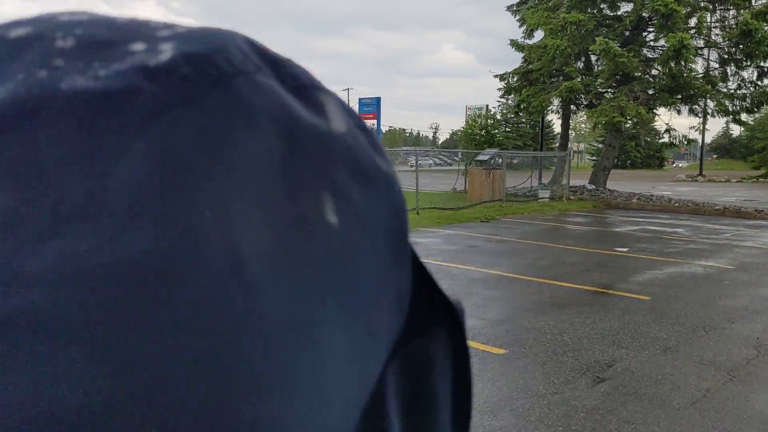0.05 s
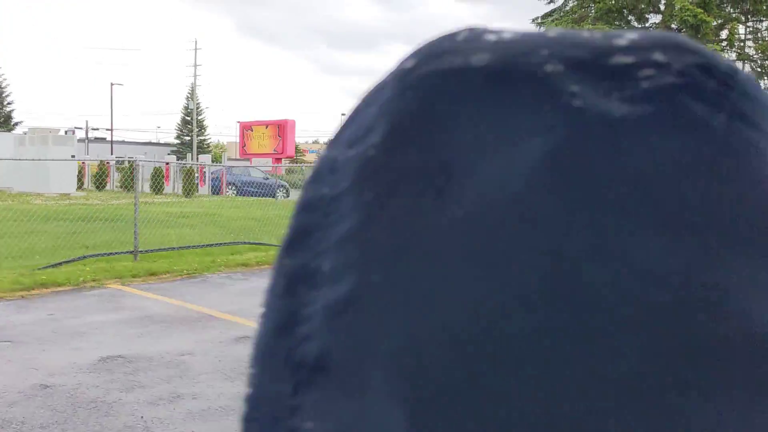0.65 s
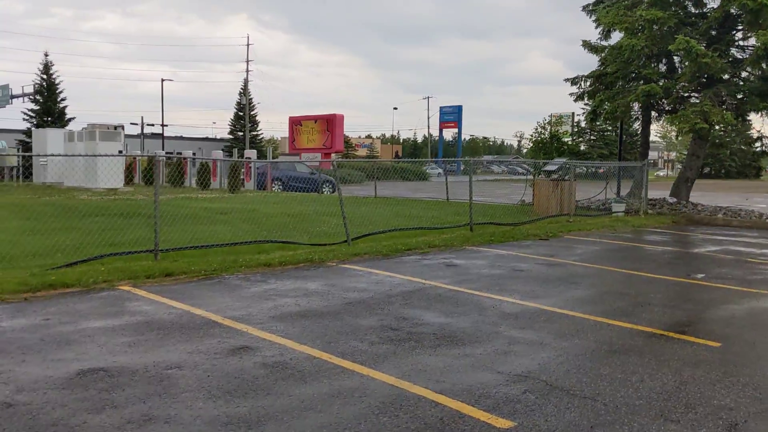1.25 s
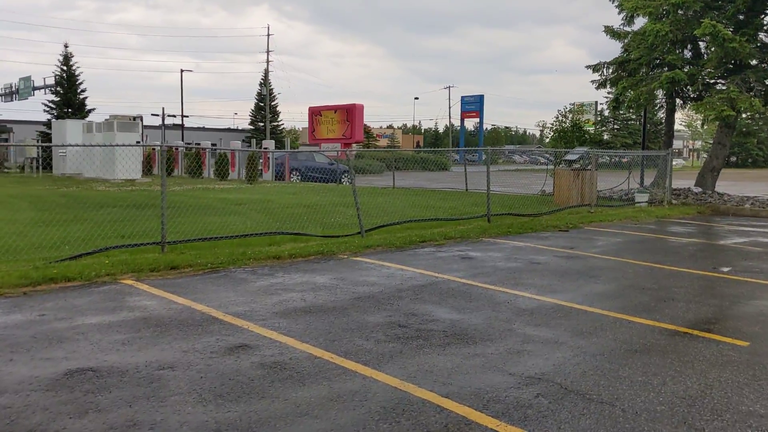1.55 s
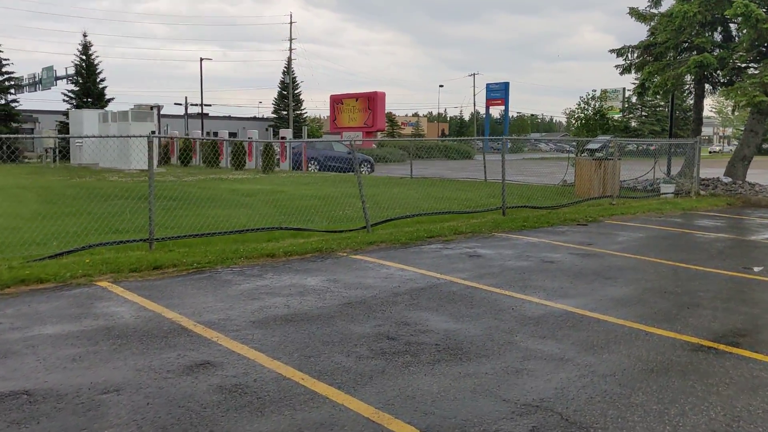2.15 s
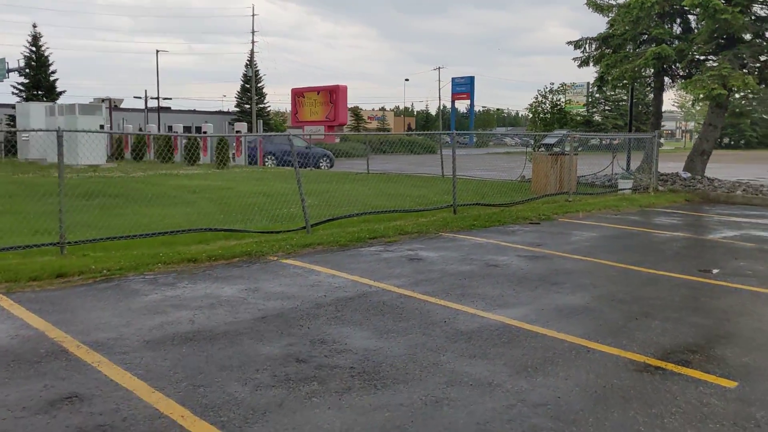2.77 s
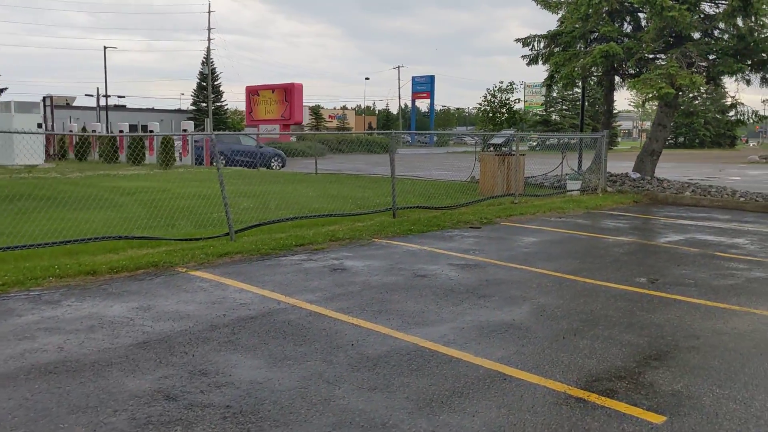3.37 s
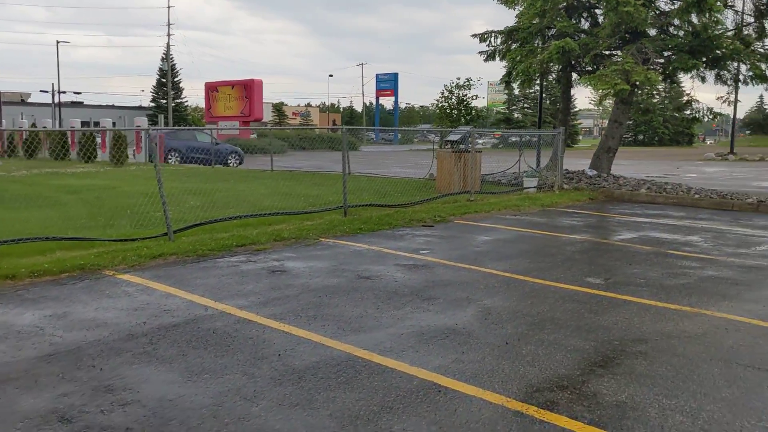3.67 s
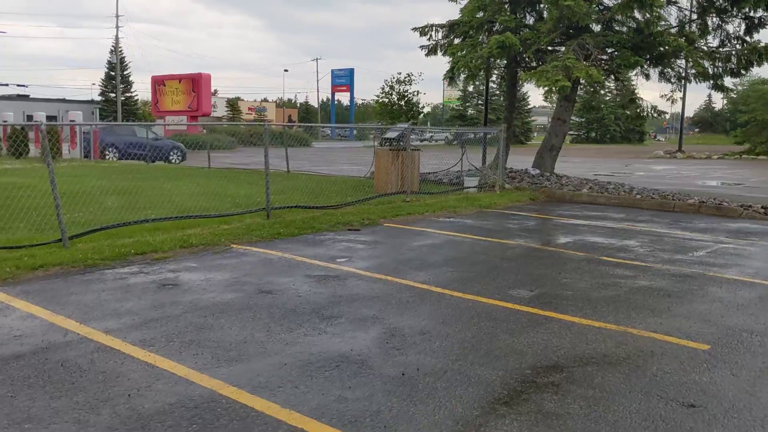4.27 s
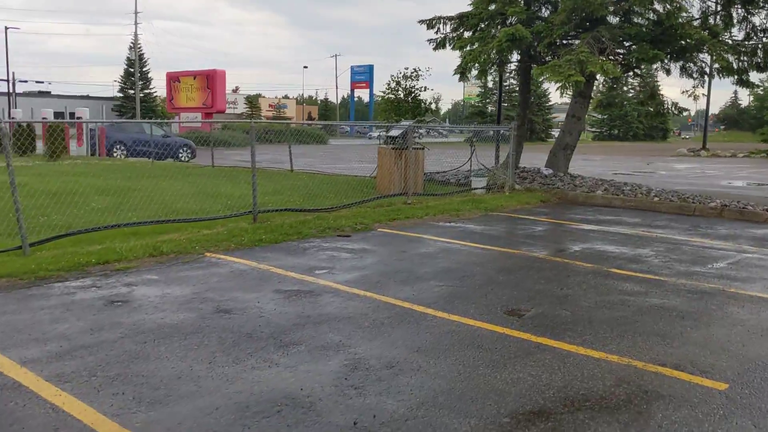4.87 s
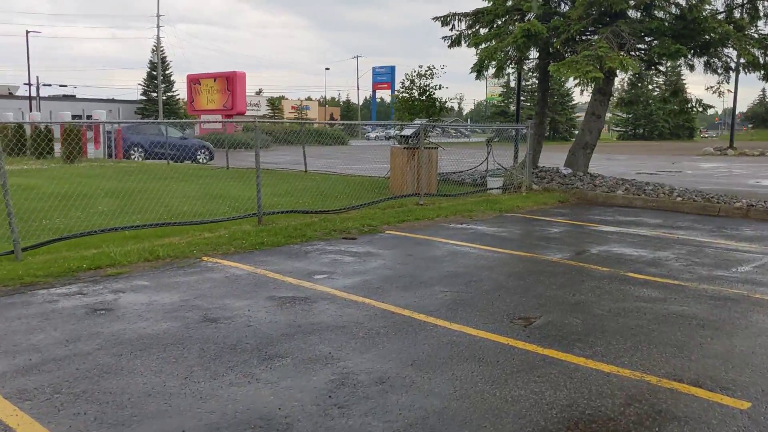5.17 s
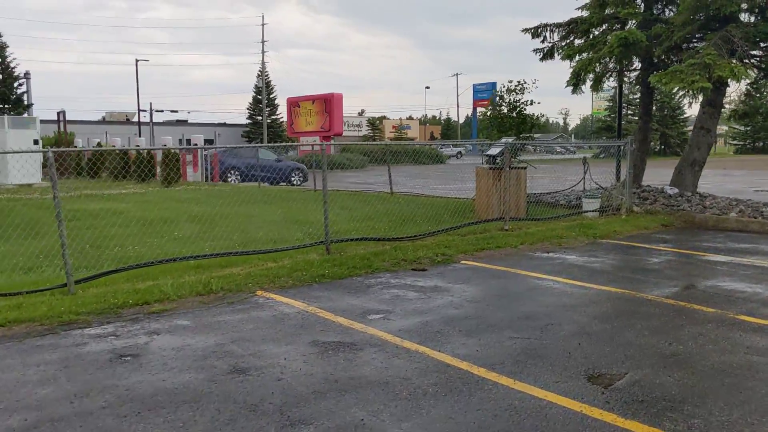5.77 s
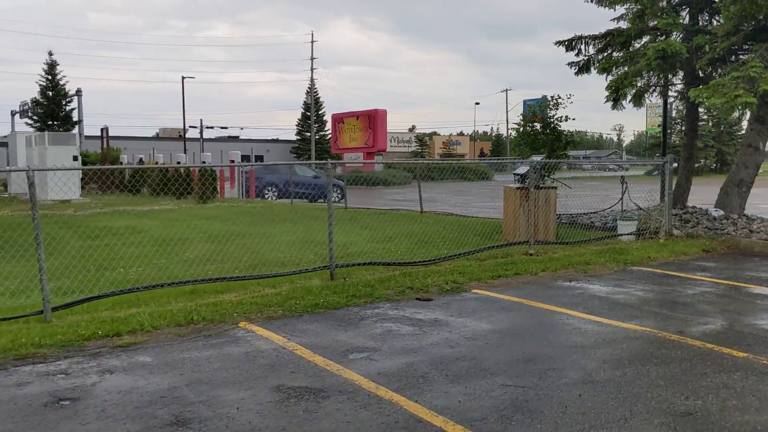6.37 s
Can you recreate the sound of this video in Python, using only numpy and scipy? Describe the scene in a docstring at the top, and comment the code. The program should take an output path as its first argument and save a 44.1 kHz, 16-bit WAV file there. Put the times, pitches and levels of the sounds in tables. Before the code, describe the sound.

Light rain falls on an umbrella held just above the microphone in a wet car park. Big drops pat the tight cloth irregularly, with small ones pattering and ticking between them. Fine rain sizzles softly on the ground, with a few tiny splashes. Behind it, a low electrical hum holds steady and faraway traffic washes along, one engine swelling gently as it slows.

```python
"""Light rain on an umbrella held just above the microphone, in a wet car park.
Big drops pat the tight cloth, small ones patter and tick between them, and the cloth shivers.
Fine rain sizzles on the ground, where splashes and a brief trickle of drips ring as tiny bubbles.
Behind the rain, a machine hums on mains power and a thin, distant whine fades early on.
An engine swells and slows in the wash of faraway traffic."""
import sys
import numpy as np
from scipy import signal
from scipy.fft import rfft, irfft, next_fast_len
from scipy.io import wavfile
from scipy.ndimage import map_coordinates

SR = 44100
rng = np.random.default_rng(int(sys.argv[2]) if len(sys.argv) > 2 else 0)


def pcm_store(signal):
    """Save signal as 16-bit PCM."""
    levels = np.round(np.clip(np.atleast_2d(signal), -1, 1) * 32767)
    wavfile.write(sys.argv[1], SR, levels.astype(np.int16).T)


N = 283122

# Distant traffic. Each row: time in seconds, then relative dB of rumble, road roar and tyre noise.
TRAFFIC_LEVELS = [(0.0, -42, -41, -53), (0.6, -43, -41.5, -45), (2.1, -42, -42, -45.5),
                  (3.1, -42, -43.5, -46.5), (4.3, -44, -45.5, -46.5), (5.3, -44, -42.5, -43),
                  (6.42, -44, -47, -46)]
# The passing engine. Each row: time in seconds, firing rate in Hz, relative level in dB.
ENGINE_PATH = [(0, 90, -54), (1.3, 89.4, -40), (2.6, 86.7, -44), (3.45, 84.4, -36.5), (4.2, 82.8, -37),
               (5.1, 80.7, -43), (5.8, 76.5, -34), (6.42, 75, -44)]
# The distant whine. Each row: time in seconds, pitch in Hz, level in dB.
WHINE_PATH = [(0, 296, -48), (.6, 296, -48), (1.1, 304.4, -61.5), (6.42, 300.2, -60.5)]
# The hum's first three harmonics. Each row: level in dB, share of the swell it follows.
HUM_HARMONICS = [(-32, 0.29), (-34.5, 1), (-39, 0.88)]
# The hum's weak overtones. Each row: pitch in Hz, level in dB.
HUM_OVERTONES = [(240.8, -49), (316, -66.5), (361, -62), (373.5, -59)]
# The hum swells and fades as the microphone moves. Each row: time in seconds, change in dB.
HUM_SWELL_DB = [(0, -.5), (.8, 0.6), (1.5, -3), (2.1, .5), (2.95, 0.5), (3.5, -1.5), (4.3, 2), (4.9, -5),
                (5.25, 1.7), (6.42, -.5)]
# The tone colours of traffic and fine rain. Each row: frequency in Hz, relative strength in dB.
RUMBLE_COLOUR = [(15, -14), (35, -23), (55, 0), (90, 1.5), (140, 0), (230, -4), (300, -12.5), (420, -15),
                 (900, -39.5)]
ROAD_COLOUR = [(100, -26), (300, -9.5), (600, 1), (850, -7), (1400, -7.5), (4000, -31)]
TYRE_COLOUR = [(400, -23), (800, 2), (1150, 1), (1400, -2), (1800, -1), (2600, -8.5), (5000, -13),
               (10000, -35)]
HISS_COLOUR = [(800, -6), (2500, 4.5), (4500, 9.5), (7000, 1), (10500, 1), (12500, -3.5), (14500, -18),
               (16000, -22)]
SIZZLE_COLOUR = [(900, -43), (2000, 3.5), (3200, 0.5), (4600, -5.5), (7000, -17), (14000, -33)]
FIZZ_COLOUR = [(7000, -37), (10800, -11), (12200, 8), (13800, -1), (16000, -24)]
# Sound from all around. Each row: frequency in Hz, how alike left and right are (1 is the same).
STEREO_LIKENESS = [(60, 0.9), (130, 0.95), (290, 0.84), (640, 0.38), (1300, 0.0059), (15000, 0.035)]
# Fine rain. Each row: time in seconds, then relative dB of sizzle, hiss and fizz.
DRIZZLE_LEVELS = [(0.0, -45.5, -57, -66), (0.5, -43, -56, -66), (2.0, -42.5, -48, -65),
                  (2.9, -44.5, -49, -65), (3.8, -50.5, -51, -58.5), (4.9, -50, -50, -61),
                  (5.6, -52, -56.5, -62), (6.42, -54, -59.5, -69)]
# Soft splashes on the ground. Each row: time in seconds, relative level in dB, centre pitch in Hz.
GROUND_SPLASHES = [(0.185, -50.5, 5460), (0.592, -51, 13000), (0.658, -49, 3020), (2.287, -49.5, 7050),
                   (2.547, -46, 3940), (3.333, -59, 7900), (5.058, -54, 13100), (5.232, -46.5, 2684)]
# How the cloth answers a drop. Each row: frequency in Hz, relative strength in dB.
CLOTH_COLOUR = [(60, -29), (250, -8), (400, 1), (540, 3.5), (750, 1), (1000, -3), (1400, -1.5), (2400, -6),
                (4000, -12), (6500, -24), (12500, -28), (16000, -37)]
# A bursting drop smears its sound in time. Each row: frequency in Hz, share of the smear it gets.
SPATTER_SHARE = [(500, 0.0094), (1200, 0.18), (2200, 0.45), (4000, 0.7), (7000, 1)]
# Big drops on the cloth. Each row: time in seconds, level in dB, snap (upper middle) boost in dB,
# spray (treble) boost in dB.
BIG_DROPS = [(0.053, -38.5, -6, -3), (0.0966, -32.4, -1, 5), (0.121, -37.5, 0, -7), (0.1426, -39, -5, 5),
             (0.2815, -35.5, 0, -4), (0.302, -34.5, -13, -11), (0.3765, -36.5, -7, -5),
             (0.5395, -37, -2, 4), (0.5657, -48, 5, 25), (0.6565, -36, -1, 0), (0.943, -34, -4, -11),
             (1.0807, -33, -6, -4), (1.3169, -32.5, -5.5, -1), (1.4732, -41, 2, 12), (1.52, -34.5, 4, 2),
             (1.5625, -30, -1.5, 3), (1.7315, -33, 8.5, 6.5), (1.8243, -34, 5, 1), (2.007, -35.5, -2, 0),
             (2.0143, -32.5, 0, 0), (2.1602, -34.5, -8, -3), (2.197, -35.5, 6, -7), (2.2342, -28.5, 1.5, 3),
             (2.254, -38, -6, 6), (2.4032, -36.5, 1, -10), (2.5617, -38, 2, -2), (2.6185, -36, -5, 6),
             (2.8028, -38.5, -3, -6), (2.9066, -44.5, 8, 25), (2.9491, -32, 0.5, 3),
             (3.0308, -38.5, -9, -1), (3.1499, -33.5, -6, -4), (3.2445, -28.5, -2, -3),
             (3.3527, -27.5, -3, 0), (3.39, -28, 5.5, 3), (3.4515, -37.5, -4, -10), (3.861, -34.5, 1, 1),
             (4.0472, -44, 10, 21), (4.237, -35.5, 1, 6), (4.3659, -35, 2, 4), (4.3812, -38.5, -8, -10),
             (4.5583, -34.5, -7, 0), (4.753, -37.5, -8, 4), (4.8109, -36.5, -6, -7), (5.0542, -37.5, 2, 0),
             (5.423, -37.5, -11, -6), (5.608, -37, -5, -12), (5.6558, -38.5, -1, -10),
             (5.74, -36.5, -3, 6.5), (5.9298, -38.5, 5, 4), (5.9943, -27.5, -0.5, -6),
             (6.0713, -40, -1, -13), (6.1618, -39, 4, 12.5), (6.2391, -37.5, -9, -15)]
# Peaks and dips of each microphone opening. Each row: centre in Hz, width in Hz, gain in dB.
LEFT_OPENING = [(930, 34, -7.5), (1370, 277, 5.5), (1556, 103, -6.5), (2278, 113, 7), (2530, 170, -3),
                (3540, 26, -11), (4320, 88, 3.5), (5220, 150, 3.5), (6860, 180, 1.5), (7150, 160, 7.5),
                (7260, 220, -2.5), (9070, 200, 5.5), (12200, 750, 1)]
RIGHT_OPENING = [(406, 41, -4), (633, 220, 1.5), (1400, 20, 9), (2110, 140, -1), (2456, 69, 5),
                 (5200, 130, -4), (6490, 120, -7), (6500, 370, 7.5), (7530, 120, 6.5), (8240, 200, 5),
                 (9100, 170, -17), (10040, 130, 8.5), (10650, 520, -14)]


def amp(db):
    """Turn decibels into a gain."""
    return 10 ** (np.asarray(db) / 20)


def unit(x):
    """Scale x to an average (rms) level of 1."""
    return x / np.sqrt(np.mean(x ** 2) + 1e-20)


def along(points, hz):
    """Read between (Hz, value) points on a log frequency scale."""
    point_hz, values = np.transpose(points)
    return np.interp(np.log(hz + 1), np.log(point_hz + 1), values)


def curves(rows):
    """Turn each column after the time into one value per sample."""
    times, *columns = np.transpose(rows)
    return [np.interp(np.arange(N) / SR, times, column) for column in columns]


def wobble(rate):
    """A smooth curve through `rate` random points a second."""
    stride = int(np.clip(SR / rate / 16, 1, 64))
    at = np.arange(0, N + stride, stride)
    points = rng.standard_normal(int(N * rate / SR) + 4)
    return np.interp(np.arange(N), at, map_coordinates(points, [at * rate / SR]))


def filtered(x, response):
    """Scale each frequency in x by response(hz)."""
    size = next_fast_len(N + 8192)
    return irfft(rfft(x, size) * response(np.fft.rfftfreq(size, 1 / SR)), size)[..., :N]


def pan(lean_db):
    """Two gains, the left one lean_db louder than the right."""
    return amp([[lean_db / 2], [-lean_db / 2]])


def add(track, s, sound):
    """Mix a stereo sound into the track at s seconds."""
    part = track[:, max(round(s * SR), 0):][:, :sound.shape[1]]
    part += sound[:, :part.shape[1]]


def tone(hz):
    """A pure tone that follows a pitch curve."""
    return np.sqrt(2) * np.sin(2 * np.pi * (np.cumsum(hz) / SR + rng.random()))


def wash(colour):
    """Noise from all around: left and right are alike in the bass, unrelated in the treble."""
    def response(hz):
        width = np.arccos(np.clip(along(STEREO_LIKENESS, hz), -1, 1)) / 2
        return amp(along(colour, hz)) * [np.cos(width), np.sin(width)]
    mid, side = filtered(rng.standard_normal((2, N)), response)
    return unit(np.array([mid + side, mid - side]))


def traffic():
    """Rumble, road roar and tyre noise from afar, with one engine slowing down."""
    rumble_db, road_db, tyre_db = curves(TRAFFIC_LEVELS)
    firing_hz, engine_db = curves(ENGINE_PATH)
    engine = amp(engine_db + 2.1 * wobble(7)) * tone(firing_hz + 0.856 * wobble(4.4))
    rumble = amp(rumble_db + 7.5) * wash(RUMBLE_COLOUR)
    road = amp(road_db - 4 + wobble(12)) * wash(ROAD_COLOUR)
    tyres = amp(tyre_db + 1 + wobble(12)) * wash(TYRE_COLOUR)
    return pan(2.75) * (engine + rumble + road) + pan(3) * tyres


def far_whine():
    """A thin, wavering tone in the distance that fades early on."""
    hz, db = curves(WHINE_PATH)
    return amp(db + 2.7 * wobble(5.98)) * tone(hz + wobble(5))


def machine_hum(mains_hz=60.2, drift_hz=0.091, waver_db=0.62):
    """Multiples of the mains pitch swell and fade together as the microphone moves; each also wavers."""
    pitch = mains_hz + drift_hz * wobble(3.03)
    swell_db, = curves(HUM_SWELL_DB)
    strong = sum(amp(db + share * swell_db + waver_db * wobble(4)) * tone(k * pitch)
                 for k, (db, share) in enumerate(HUM_HARMONICS, 1))
    weak = sum(amp(db + 2 * wobble(2.94)) * tone(hz + 0.603 * wobble(4.014)) for hz, db in HUM_OVERTONES)
    return pan(0.6) * (strong + weak)


def drizzle():
    """Fine rain on wet ground: a clumpy sizzle close by, a grainy hiss beyond, flurries of thin fizz."""
    sizzle_db, hiss_db, fizz_db = curves(DRIZZLE_LEVELS)
    sizzle = unit(wash(SIZZLE_COLOUR) * amp(2.5 * wobble(220)))
    hiss = unit(wash(HISS_COLOUR) * amp(0.5 * wobble(1500) + 2 * wobble(40)))
    fizz = unit(wash(FIZZ_COLOUR) * amp(2 * wobble(7.6) + 3.2 * wobble(45) + 1.5 * wobble(900)))
    return pan(7.5) * (amp(sizzle_db - 3.5) * sizzle + amp(hiss_db) * hiss + amp(fizz_db) * fizz)


def trickle(start_s=1.772, gap_s=0.0572, first_hz=3040, rise_hz_per_s=930, count=18):
    """Water runs off the umbrella in evenly spaced drips that creep up in pitch. Gives splash rows."""
    age = gap_s * np.arange(count)
    weight, pitch = rng.standard_normal((count, 2)).T
    centre_hz = (first_hz + rise_hz_per_s * age) * 2 ** (0.16 * pitch)
    level_db = -46.5 + 2 * weight
    return list(zip(start_s + age, level_db, centre_hz))


def splashes(scatter_s=0.0039, spread_octaves=0.18, ring_cycles=2.9, bubble_count=14, size=2048):
    """Each splash or drip is a cluster of tiny bubbles that ring briefly around one pitch."""
    out = np.zeros((2, N))
    t = (np.arange(size) - size / 2) / SR
    for s, db, centre_hz in [*GROUND_SPLASHES, *trickle()]:
        when, pitch, weight = rng.standard_normal((3, 2, bubble_count, 1))
        cycles = np.maximum(t - scatter_s * when, 0) * centre_hz * 2 ** (spread_octaves * pitch)
        swell_and_fade = (1 - np.exp(-cycles)) * np.exp(-cycles / ring_cycles)
        bubbles = amp(4.2 * weight) * np.sin(2 * np.pi * cycles) * swell_and_fade
        add(out, s + t[0], amp(db) * unit(bubbles.sum(axis=1)))
    return out * pan(5.5)


def shiver_and_echo(blows, shiver_db=-11, fade_s=0.1, echo_db=-17, echo_s=0.0076):
    """The cloth and ribs shiver briefly after each blow, and the ground sends it back once."""
    t = np.arange(SR // 8) / SR
    answer = rng.standard_normal((2, len(t))) * amp(-60 * t / fade_s)
    answer *= amp(shiver_db) / np.linalg.norm(answer[0])
    answer[:, 0] = 1  # the blow itself
    answer[:, round(echo_s * SR)] += amp(echo_db)
    return signal.fftconvolve(blows, answer, axes=1)[:, :N]


def pat(thud_db, snap_db, spray_db, lag_s, uneven_db, rebound_radians=0.83, spatter_s=0.001, size=512):
    """One drop: a sharp push and a dead rebound of the wet cloth, heard lag_s later on the right."""
    hz = np.fft.rfftfreq(size, 1 / SR)

    def random_curves():
        point_hz = np.geomspace(400, 16000, 24)
        return np.array([np.interp(hz, point_hz, row) for row in rng.standard_normal((2, 24))])

    boosts = [(380, thud_db), (650, 0), (1000, 0), (2200, snap_db),
              (4000, snap_db - 0.67 * thud_db), (7000, spray_db)]
    # Every spot on the cloth sends its own tone colour to each side.
    colour_db = along(CLOTH_COLOUR, hz) + along(boosts, hz) + uneven_db * random_curves()
    # This fold turns the colour into a pulse that starts sharply and then dies away.
    fold = 1 + np.sign(size / 2 - np.arange(size))
    fold[0] = 1
    push = -np.exp(rfft(irfft(np.log(amp(colour_db))) * fold) + 1j * rebound_radians)
    # A dull ripple runs through the tight cloth a millisecond ahead of the push.
    ripple = amp(-11) * np.exp(2j * np.pi * hz * 0.001 - (hz / 1500) ** 2)
    arrival_s = size / 4 / SR + np.array([[-lag_s / 2], [lag_s / 2]])
    # The drop bursts into droplets, which spread the treble over a millisecond or two.
    arrival_s = arrival_s + spatter_s * along(SPATTER_SHARE, hz) * np.abs(random_curves())
    delay_cycles = np.cumsum(arrival_s * np.diff(hz, prepend=0), axis=1)
    return unit(irfft(push * (1 + ripple) * np.exp(-2j * np.pi * delay_cycles)))


def droplets(level_db=-56, count=30):
    """Tiny droplets tick thinly on the cloth, nearly all spray."""
    out = np.zeros((2, N))
    times = rng.uniform(0, N / SR, count)
    for s, (weight, place) in zip(times, rng.standard_normal((count, 2))):
        tick = pat(thud_db=0, snap_db=10, spray_db=30, lag_s=0.00021 * place, uneven_db=5)
        add(out, s, amp(level_db + weight) * pan(4 + 2 * place) * tick)
    return out


def patter(level_db=-47, spread_db=3.5, count=520):
    """Many small drops fall all over the umbrella."""
    out = np.zeros((2, N))
    times = rng.uniform(0, N / SR, count)
    for s, (weight, hard, wet, place) in zip(times, rng.standard_normal((count, 4))):
        db = level_db + spread_db * min(weight, 1.9)
        spray_db = 1 + 3 * hard + 3 * wet
        drop = pat(thud_db=0, snap_db=4 * hard, spray_db=spray_db, lag_s=0.000299 * place, uneven_db=6)
        add(out, s, amp(db) * pan(1.5 + 2 * place) * drop)
    return out


def big_drops(middling_db=-34, thud_growth=0.45):
    """Big drops land right overhead. Heavier ones push the cloth deeper: more thud and a duller top."""
    out = np.zeros((2, N))
    for s, db, snap_db, spray_db in BIG_DROPS:
        thud_db = thud_growth * (db - middling_db)
        drop = pat(thud_db, snap_db, spray_db, lag_s=rng.normal(0.00005, 0.00005), uneven_db=2.5)
        start_s = s - drop.shape[1] / 4 / SR  # the push comes a quarter of the way into a pat
        add(out, start_s, amp(db) * pan(rng.normal(2.6, 0.6)) * drop)
    return out


def scene():
    """Rain on the umbrella and the ground, over traffic, a whine and a hum."""
    umbrella = shiver_and_echo(big_drops() + patter() + droplets())
    ground = splashes() + drizzle()
    return umbrella + ground + traffic() + far_whine() + machine_hum()


def record(dry, top_hz=15750):
    """Each microphone opening colours the sound, and nothing above top_hz is kept."""
    def opening(bumps, hz):
        return amp(sum(db * np.exp(-((hz - centre) / width) ** 2) for centre, width, db in bumps))
    coloured = filtered(dry, lambda hz: np.array([opening(LEFT_OPENING, hz), opening(RIGHT_OPENING, hz)]))
    return filtered(coloured, lambda hz: hz < top_hz)


dry = scene()
out = record(dry)
pcm_store(out)
```